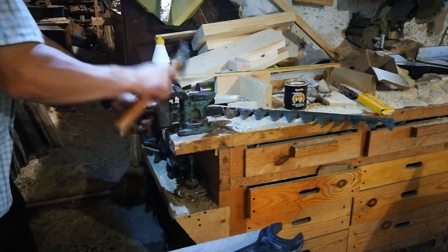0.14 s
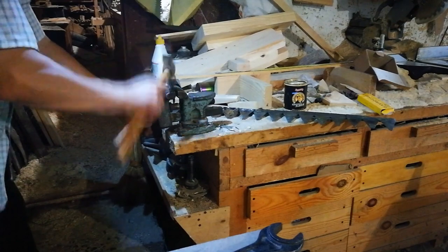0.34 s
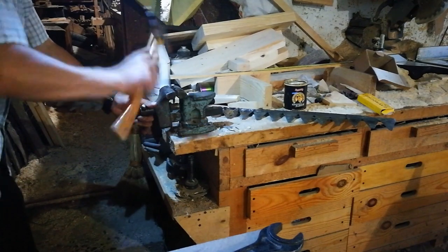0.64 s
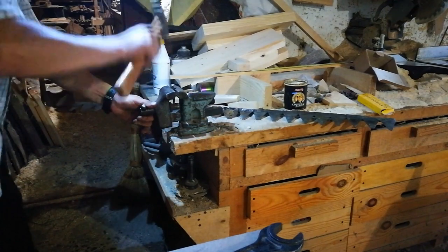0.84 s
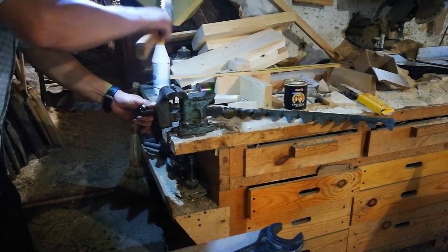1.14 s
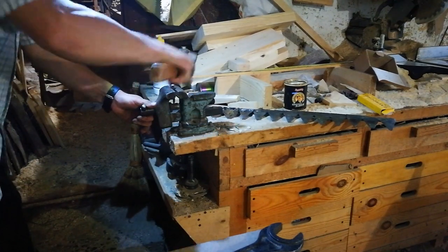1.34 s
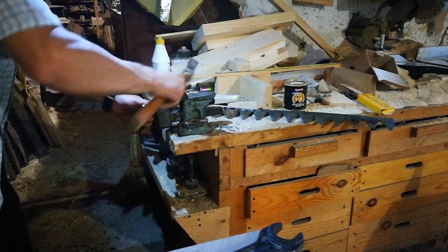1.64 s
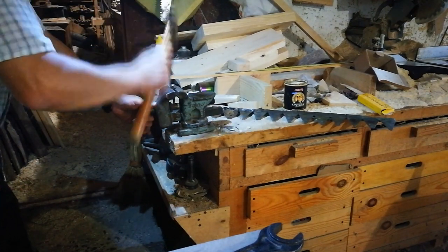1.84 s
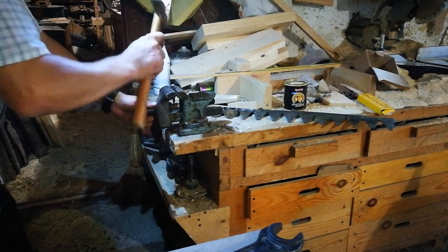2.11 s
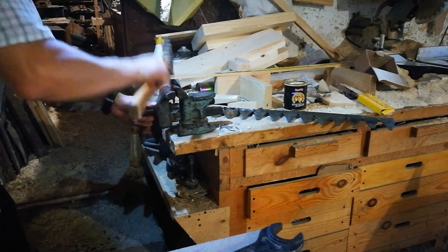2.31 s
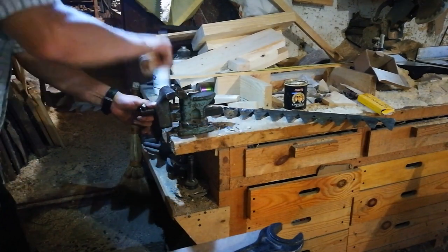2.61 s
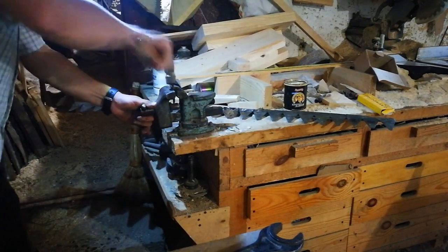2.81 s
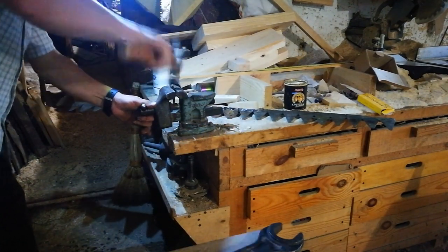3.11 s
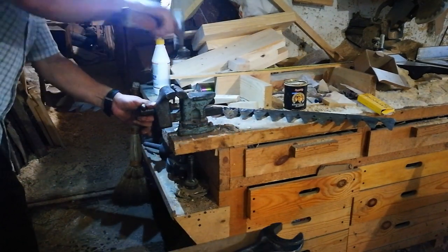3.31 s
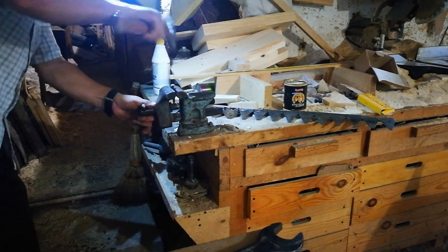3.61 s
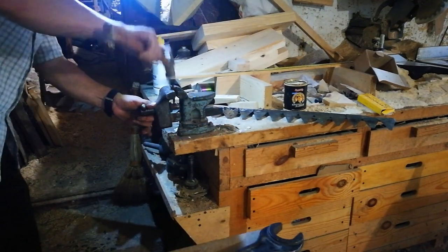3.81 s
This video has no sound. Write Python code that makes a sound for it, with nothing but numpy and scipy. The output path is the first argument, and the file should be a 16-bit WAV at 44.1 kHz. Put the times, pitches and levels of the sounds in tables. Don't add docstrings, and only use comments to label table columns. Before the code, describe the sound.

A hammer hits steel held in a bench vise. An earlier blow's tail fades at the start; twelve loud, bright clanks follow from 0.26 to 3.67 seconds, roughly 0.3 apart, varying slightly in force and brightness. Each has a hard crack, short metallic ring, woody bench thump and sometimes a rattling rebound. Close small-room echoes are clipped by noise suppression; very faint squeaks near 0.5 seconds and low rumble lie beneath.

```python
import sys
import numpy as np
from scipy import signal
from scipy.fft import rfft, irfft
from scipy.io import wavfile

SR = 44100
rng = np.random.default_rng(int(sys.argv[2]) if len(sys.argv) > 2 else 0)


def dump_mix(stems):
    frames = np.atleast_2d(stems).T
    limited = np.clip(frames, -1, 1)
    pcm = np.round(limited * 32767).astype(np.int16)
    wavfile.write(sys.argv[1], SR, pcm)


def field_ratio(decibels):
    return 10 ** (np.asarray(decibels, dtype=float) / 20)


N = 174195
LEAD = 4410
SPAN = 20480
ROOM_SHADE_SHARE = 0.95


def at_hz(points, hz):
    x, y = np.array(points).T
    return np.interp(np.log(np.maximum(hz, 1)), np.log(x), y)


def ring(clicks, hz, t60):
    r, w = field_ratio(-60 / (t60 * SR)), 2 * np.pi * hz / SR
    return signal.lfilter([0, np.sin(w)], [1, -2 * r * np.cos(w), r * r], clicks + 1e-18)


def causal(db):
    cepstrum = irfft(db * np.log(10) / 20)
    half = len(cepstrum) // 2
    cepstrum[1:half] *= 2
    cepstrum[half + 1:] = 0
    return np.exp(rfft(cepstrum))


def delayed(hz, seconds):
    return np.exp(-2j * np.pi * hz * seconds)


def contacts(rebound_db):
    rebound_s, spread_s = .034, .012
    when, strength = rng.random((2, 10))
    landing = ((rebound_s + spread_s * 2 * (when - .3)) * SR).astype(int)
    hit = np.zeros(SPAN)
    hit[0] = 1
    np.add.at(hit, landing, field_ratio(rebound_db) * 2 * (strength - .5))
    return hit


def chatter(hz):
    chatter_s, gain = .00035, .55
    lags = rng.uniform(0.26, 1.6, 4)
    step = delayed(hz, chatter_s * lags[:, None])
    return np.prod((step - gain) / (1 - gain * step), axis=0)


# frequency in Hz, level in dB per Hz.
CRACK = [(50, -8), (200, 8), (700, 3.5), (1100, 4.5), (3000, 10), (4300, -0.5), (8000, -10.5), (16000, -23)]
# frequency in Hz, width in Hz, level in dB.
CLANK = [(960, 56, 2.5), (1419, 220, 3), (1946, 500, 4), (2230, 270, -3.5), (2800, 690, 3.5),
         (4930, 200, 3), (6450, 1000, 5.5), (8340, 600, -4), (10480, 630, 3.5), (13200, 900, 0)]
# frequency in Hz, width in Hz, level in dB.
HEAD = [(4710, 90, 1), (5930, 49, 1), (9670, 120, 5), (10770, 100, 4.5), (12100, 120, 6), (15400, 200, 5)]


def crack(hit, hz, bright_db, thump_db):
    octaves = np.log2(hz / 3000 + 1e-9)
    colour_db = at_hz(CRACK, hz)
    colour_db = colour_db + bright_db * np.clip(octaves, 0, 1)
    colour_db = colour_db + thump_db * np.clip(-octaves - 2, 0, 1)
    for centre_hz, width_hz, db in CLANK:
        peak_db = db + 1.9 * rng.standard_normal()
        colour_db = colour_db + peak_db * np.exp(-((hz - centre_hz) / width_hz) ** 2)
    for centre_hz, width_hz, db in HEAD:
        peak_db = max(db + 4 * rng.standard_normal(), 0)
        colour_db = colour_db + peak_db / (1 + ((hz - centre_hz) / width_hz) ** 2)
    return rfft(hit, 2 * SPAN) * causal(colour_db) * chatter(hz)


# frequency in Hz, level in dB, t60 in seconds.
VISE = [(909.6, -38, .2), (1011, -38, 0.19), (1134, -42.5, 0.27), (1400, -39, 0.14), (1461, -38.5, 0.15),
        (1690, -43, 0.22), (1914, -34.5, 0.14), (2131.4, -38.5, 0.13), (2812, -39, 0.063), (2933, -40, 0.2),
        (4830, -52, .18), (5760, -50, 0.15), (5910, -42.5, 0.089), (9500, -60.5, 0.041)]


def vise(hit):
    rings = 0
    for hz, db, t60 in VISE:
        rings = rings + field_ratio(db + rng.normal(0, 1.94)) * ring(hit, hz * rng.normal(1, 0.0044), t60)
    rebound = hit * (np.arange(SPAN) > 0)
    return rings + field_ratio(-25.5) * ring(rebound, 1666, 0.31)


# frequency in Hz, level in dB, t60 in seconds.
BENCH = [(64.6, -44.5, 1), (78.96, -40.5, 0.38), (107, -37.5, .3), (171.2, -35.5, 0.19),
         (265.8, -41.5, 0.29), (399.4, -45, 0.23), (548, -36.5, 0.2)]


def bench(hit, thump_db):
    thump_cut_hz = 433
    push = signal.sosfilt(signal.butter(2, thump_cut_hz, fs=SR, output="sos"), hit)
    thump = 0
    for hz, db, t60 in BENCH:
        thump = thump + field_ratio(db + thump_db + rng.normal(0, 2.4)) * ring(push, hz, t60)
    return thump


def strike(hz, bright_db, thump_db, rebound_db):
    hit = contacts(rebound_db)
    rings = vise(hit) + bench(hit, thump_db)
    return crack(hit, hz, bright_db, thump_db), rfft(rings, 2 * SPAN)


# frequency in Hz, difference in dB.
SHADE = [(60, 1.5), (300, 0.5), (1000, -0.5), (2000, 2), (4000, 1), (8000, 12), (13000, 14.5)]
# frequency in Hz, level in dB.
ROOM_COLOUR = [(60, -1.5), (300, -4), (1000, 6.5), (2500, -1.5), (4500, -0.5), (7000, -8.5), (10000, -9),
               (16000, -8)]
# delay in seconds, left level in dB, right level in dB.
ECHOES = [(.0028, -20, -5), (.004, -8.5, -7.5), (.0065, -9.5, -9.5), (.0085, -4, 0.5), (0.012, -9.5, -4),
          (0.024, -17.5, -21.5)]


def early_sound(hz, shade_db, late):
    skew_s = 0.00046
    early = field_ratio(1.5) * np.array([causal(db) for db in shade_db]) * late
    for delay, left_db, right_db in ECHOES:
        level_db = np.array([[left_db], [right_db]]) + at_hz(ROOM_COLOUR, hz) + ROOM_SHADE_SHARE * shade_db
        arrival = delay + skew_s * rng.uniform(-1.06, 1) * np.array([[0], [1]])
        early = early + field_ratio(level_db) * delayed(hz, arrival)
    return early


# frequency in Hz, t60 in seconds.
ROOM_T60 = [(60, 0.81), (160, 0.3), (420, 0.37), (1100, 0.29), (2900, 0.28), (7700, 0.25), (15000, 0.12)]
# frequency in Hz, correlation from -1 to 1.
LIKENESS = [(60, 1), (150, 1), (300, 0.1), (550, 0.22), (1200, 0.49), (3000, 0.14), (12000, 0.85)]


def diffuse():
    room_db, rise_s, near_db, near_s = -26, 0.00043, 6, 0.0074
    t, tail = np.arange(SPAN) / SR, 0
    edges = 35 * 2 ** np.arange(0, 9.1, .5)
    white = rng.standard_normal((2, 2, SPAN))
    for k, (low, high) in enumerate(zip(edges, edges[1:])):
        band = signal.butter(2, [low, high], "band", fs=SR, output="sos")
        mid, side = signal.sosfilt(band, white[k % 2])
        hz = np.sqrt(low * high)
        alike = np.clip(at_hz(LIKENESS, hz), -1, 1)
        fade = field_ratio(at_hz(ROOM_COLOUR, hz) - 60 * t / at_hz(ROOM_T60, hz))
        tail = tail + fade * (np.sqrt(1 + alike) * mid + np.sqrt(1 - alike) * side * [[1], [-1]])
    rise = 1 - np.exp(-t / rise_s)
    near = field_ratio(near_db * np.exp(-t / near_s))
    return field_ratio(room_db) * tail * rise * near


# start in seconds, peak in dB, brightness in dB, bench thump in dB, rebound in dB.
BLOWS = [(.2602, -9, 2, 2, -10), (.5862, -9.5, 3.5, 1.5, -29), (.8888, -8, 3.5, 0, -16.5),
         (1.2129, -11, 5, 0.5, -25), (1.5149, -11.5, 5, 3, -19.5), (1.8176, -7, -1, 1, -14.5),
         (2.1359, -9.5, 10, 3.5, -31.5), (2.4428, -8.5, 6.5, 0, -35), (2.7423, -11, .5, 1, -33.5),
         (3.048, -11.5, 5, 1, -29.5), (3.3695, -11, 0.5, 0, -22), (3.6686, -10, 2.5, 0, -33)]
# peak, brightness, bench thump and rebound, all in dB.
EARLIER_BLOW = (-14, 3, 2.5, -20.5)


def hammer():
    earlier_s, right_lag_s, fresh_share, ring_wet_db = -.058, 5 / 44100, 0.34, -9
    hz = np.fft.rfftfreq(2 * SPAN, 1 / SR)
    shade_db = at_hz(SHADE, hz) * [[.5], [-.5]]
    late = delayed(hz, np.array([[0], [right_lag_s]]))
    early = early_sound(hz, shade_db, late)
    kept, others = diffuse(), [diffuse() for _ in range(4)]
    out = np.zeros((2, LEAD + N + 2 * SPAN))
    length = 3 * SPAN // 2
    for k, (s, db, *manner) in enumerate([(earlier_s, *EARLIER_BLOW)] + list(BLOWS)):
        fresh = others[k % 4] * (-1) ** (k // 4)
        tail = np.sqrt(1 - fresh_share) * kept + np.sqrt(fresh_share) * fresh
        wet = rfft(tail, 2 * SPAN) * late * field_ratio(ROOM_SHADE_SHARE * shade_db)
        crack_part, ring_part = strike(hz, *manner)
        heard = crack_part * (early + wet) + ring_part * (early + field_ratio(ring_wet_db) * wet)
        i = LEAD + int(s * SR)
        out[:, i:i + length] += field_ratio(db + 11) * irfft(heard)[:, :length]
    return out[:, LEAD:LEAD + N]


# frequency in Hz, level in dB per Hz.
RUMBLE = [(25, -11), (50, -9), (75, 0.5), (120, -17), (250, -7.5), (600, -38.5), (2000, -51), (16000, -62)]


def rumble():
    white = rng.standard_normal((3, N))
    both = white[0] + .15 * white[1:]
    x = irfft(rfft(both) * field_ratio(at_hz(RUMBLE, np.fft.rfftfreq(N, 1 / SR))), N)
    return field_ratio(-78) * x / x.std()


# start in seconds, frequency in Hz.
SQUEAK_AT = [
    (.53, 4900),
    (.52, 10350),
    (.545, 9300),
    (.47, 4050),
    (.14, 200),
]
# length in seconds, t60 in seconds, level in dB.
SQUEAKS = [(0.057, .012, -67.5), (.035, 0.0085, -71.5), (0.055, 0.0068, -67), (0.062, 0.012, -72),
           (.07, 0.045, -58)]


def squeaks():
    t, out = np.arange(N) / SR, 0
    for (s, hz), (length, t60, db) in zip(SQUEAK_AT, SQUEAKS):
        noise = ring(rng.standard_normal(N), hz, t60)
        swell = np.sin(np.pi * np.clip((t - s) / length, 0, 1))
        out = out + field_ratio(db) * noise / noise.std() * swell
    return out * field_ratio(np.array([[3], [-3]]))


def scene():
    return hammer() + rumble() + squeaks()


def band_limit(x):
    return signal.sosfilt(signal.butter(12, 17000, fs=SR, output="sos"), x)


def record(dry):
    mic_low_cut_hz, top_hz = 130, 17200
    gate_db, slope, depth_db, smooth_s, from_hz = -55, 0.85, 18, 0.011, 160
    dry = signal.sosfilt(signal.butter(2, mic_low_cut_hz, "high", fs=SR, output="sos"), dry)
    low = signal.sosfiltfilt(signal.butter(1, from_hz, fs=SR, output="sos"), dry)
    rest = dry - low
    r = np.exp(-1 / (smooth_s * SR))
    power = np.mean(rest ** 2, axis=0)
    smooth = signal.lfilter([1 - r], [1, -r], power, zi=[power[:400].mean()])[0]
    level_db = 10 * np.log10(smooth + 1e-14)
    x = low + rest * field_ratio(np.clip(slope * (level_db - gate_db), -depth_db, 0))
    rounded = .95 * np.tanh(x / .95)
    return band_limit(signal.sosfilt(signal.cheby2(10, 60, top_hz, fs=SR, output="sos"), rounded))


dry = scene()
out = record(dry)
dump_mix(out)
```